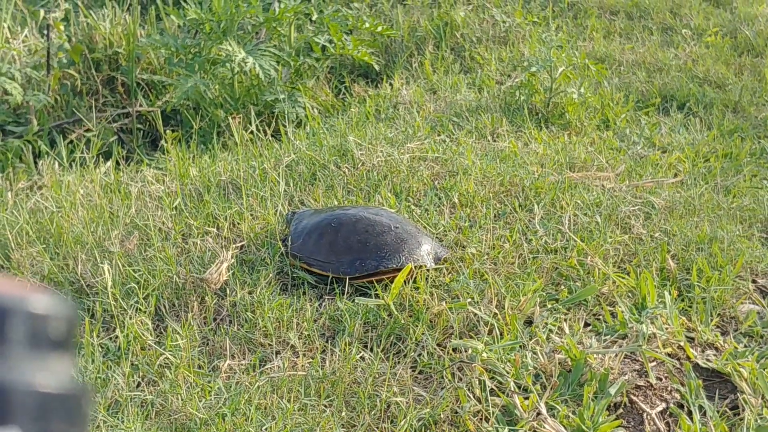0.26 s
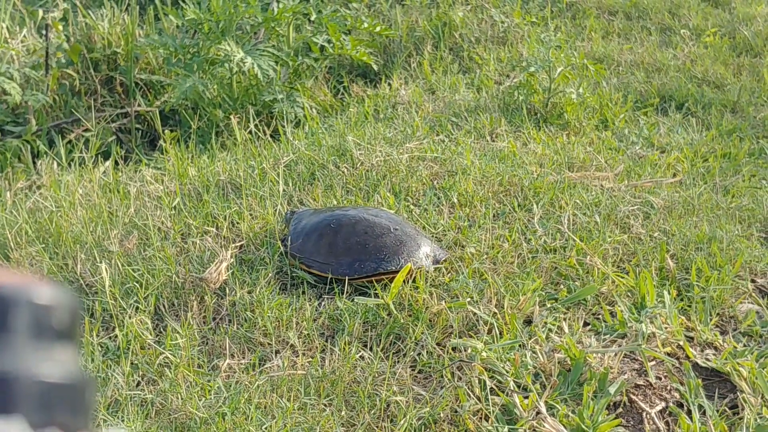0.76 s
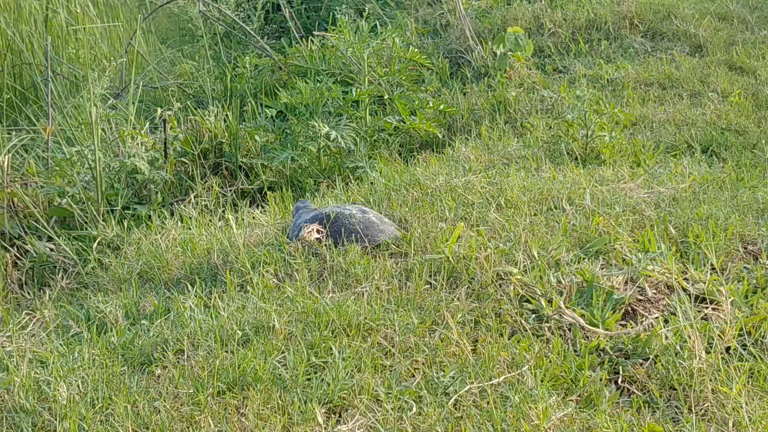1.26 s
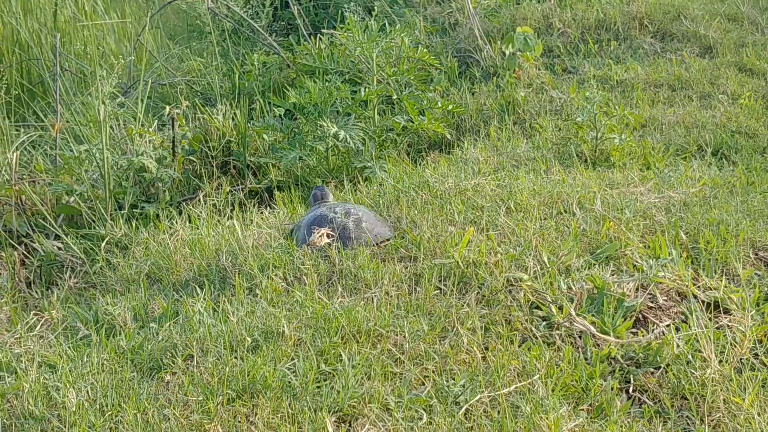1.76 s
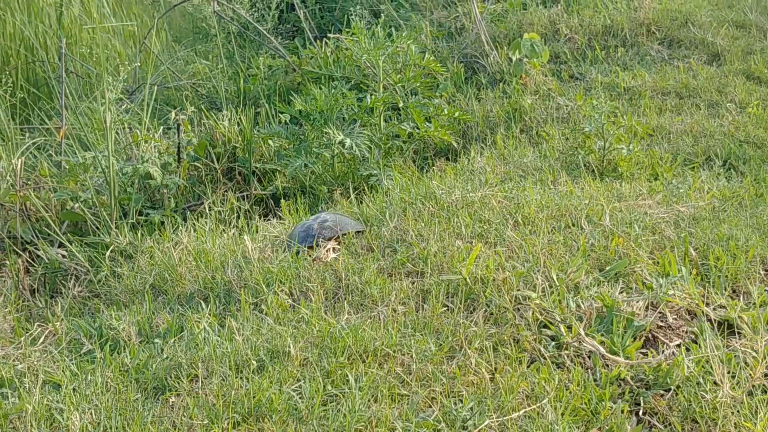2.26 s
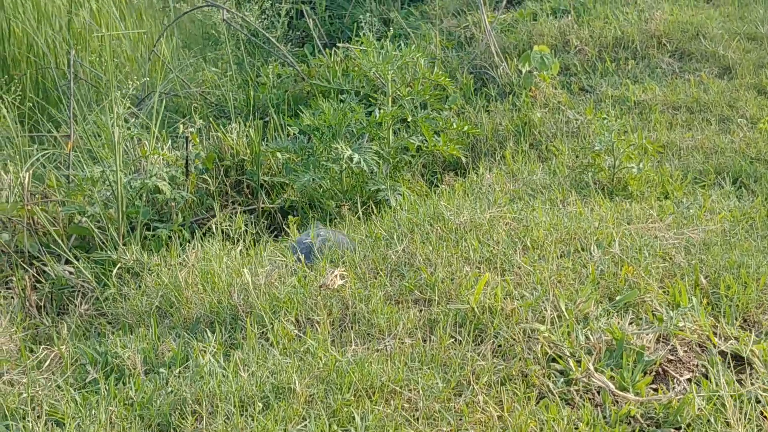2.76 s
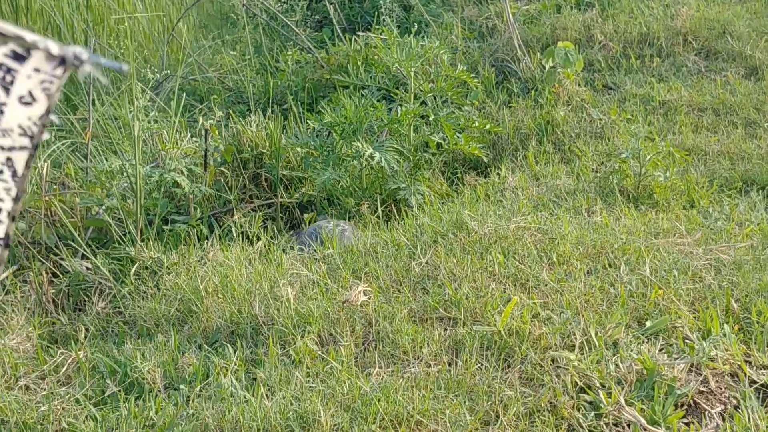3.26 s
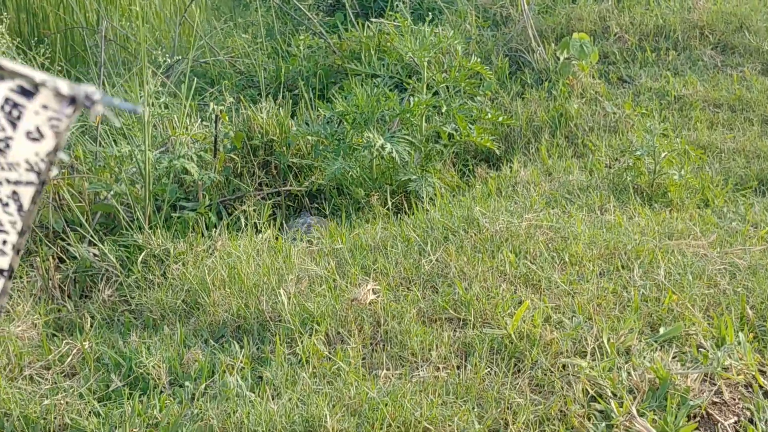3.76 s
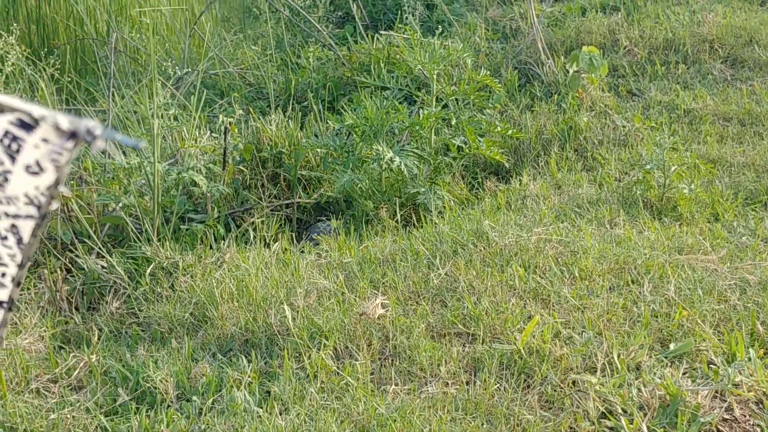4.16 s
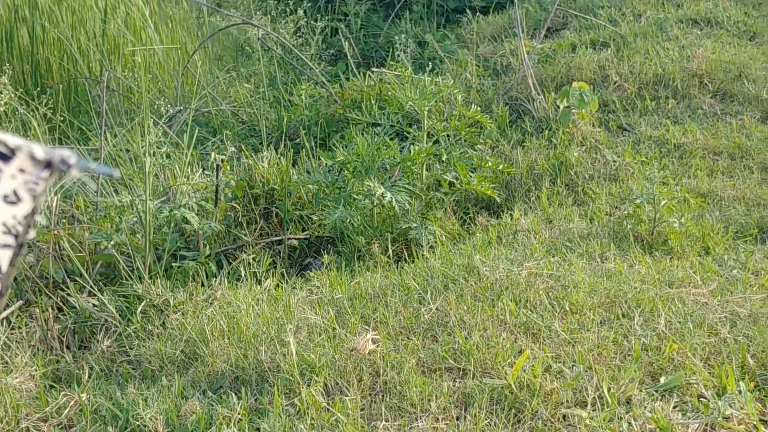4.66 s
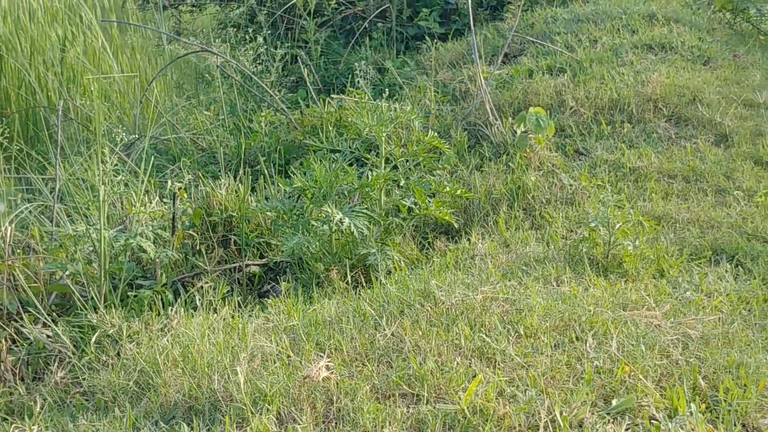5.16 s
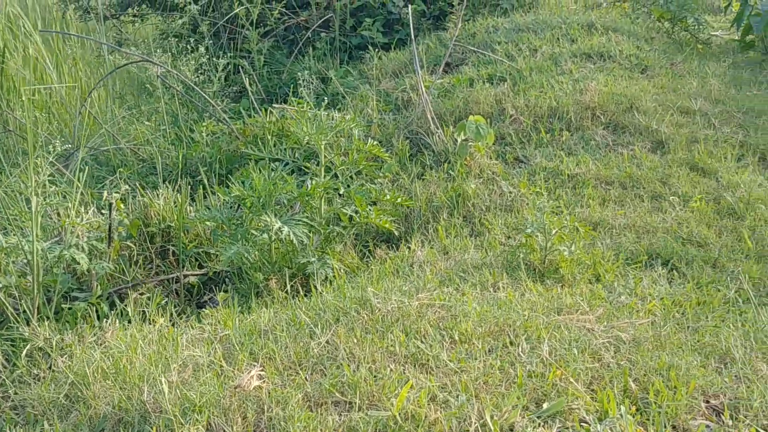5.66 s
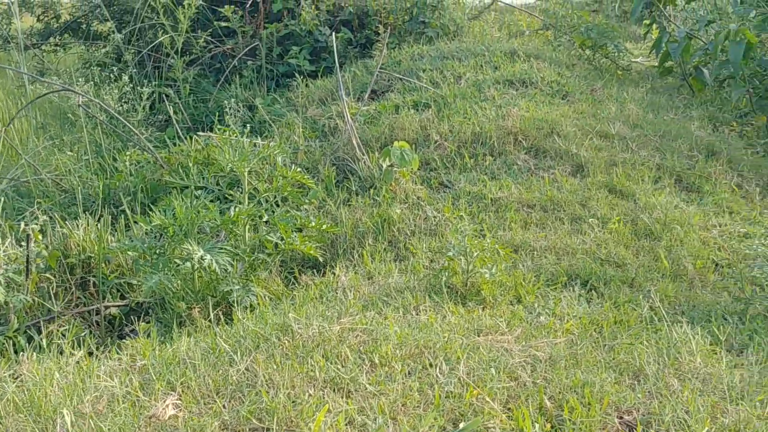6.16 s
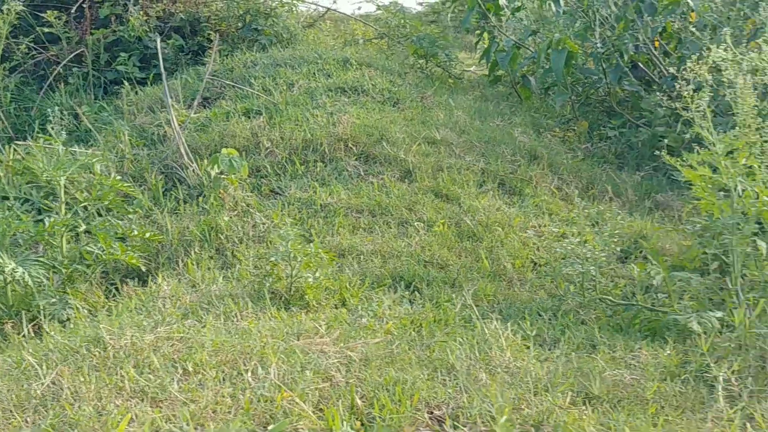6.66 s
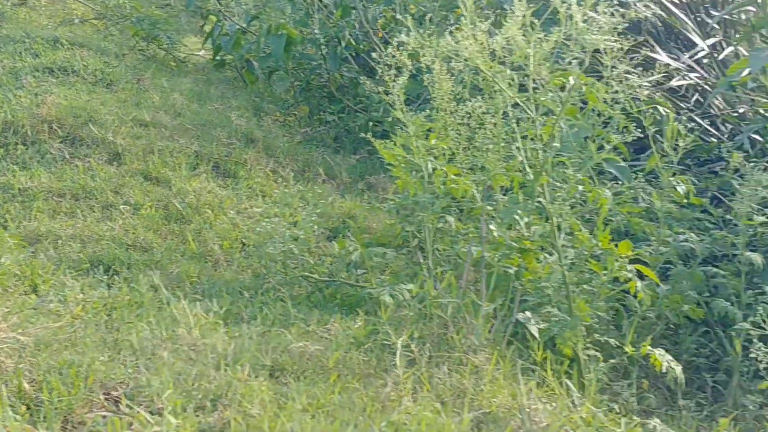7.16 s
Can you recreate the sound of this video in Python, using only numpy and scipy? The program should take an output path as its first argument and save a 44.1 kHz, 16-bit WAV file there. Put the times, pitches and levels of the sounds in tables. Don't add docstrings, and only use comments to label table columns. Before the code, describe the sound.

Outdoors, crickets ring thinly on the left while sparse bird chips grow into rapid chirrups and falling whistles, with gusts and rustles at the microphone.

```python
import sys
import numpy as np
from scipy import signal
from scipy.fft import rfft, irfft
from scipy.io import wavfile
from scipy.ndimage import uniform_filter1d

SR = 44100
rng = np.random.default_rng(int(sys.argv[2]) if len(sys.argv) > 2 else 0)


def linear_from_db(decibels):
    return 10 ** (np.asarray(decibels, float) / 20)


def bounce(signal):
    frames = np.transpose(np.atleast_2d(signal))
    limited = np.clip(frames, -1, 1)
    pcm = np.round(limited * 32767).astype(np.int16)
    wavfile.write(sys.argv[1], SR, pcm)


N = 326340
CHANGE_S = 1.47


def curve(rows):
    s, value = np.transpose(rows)
    return np.interp(np.arange(N) / SR, s, value)


def coloured(spectrum):
    hz, db = np.transpose(spectrum)
    bins = np.maximum(np.fft.rfftfreq(N, 1 / SR), 1)
    gain = linear_from_db(np.interp(np.log(bins), np.log(hz), db, left=-90, right=-90))
    x = irfft(rfft(rng.standard_normal((2, N))) * gain, N)
    return x / np.sqrt(np.mean(x ** 2))


def drift(rate_hz):
    r = np.exp(-2 * np.pi * rate_hz / SR)
    x = signal.lfilter([1], [1, -2 * r, r * r], rng.standard_normal(N + SR))[SR:]
    return x / x.std()


def swells(s, db, rise_db_per_s, fall_db_per_s, hold_s=0):
    grid = np.arange(0, N + 32, 32)
    t = grid[:, None] / SR - s
    gain = linear_from_db(db + rise_db_per_s * np.minimum(t, 0) - fall_db_per_s * np.maximum(t - hold_s, 0))
    return np.interp(np.arange(N), grid, gain.sum(axis=1))


def add(out, s, sound, pan_db):
    at = round(s * SR)
    sound = sound[max(-at, 0):N - at]
    at = max(at, 0)
    out[:, at:at + len(sound)] += sound * linear_from_db(np.array([[pan_db / 2], [-pan_db / 2]]))


def sing(hz, db, fade_s):
    ends = np.minimum(np.arange(len(hz)), np.arange(len(hz))[::-1]) / SR / fade_s
    phase = 2 * np.pi * np.cumsum(hz) / SR
    return np.sqrt(2) * linear_from_db(db) * np.sin(np.pi / 2 * np.minimum(ends, 1)) ** 2 * np.sin(phase)


def outdoors(x, ground_db, leaves_db, t60):
    t = np.arange(round(.3 * SR)) / SR
    paths = rng.standard_normal((2, len(t))) * linear_from_db(-60 * t / t60) * np.minimum(t / 0.0026, 1)
    paths = signal.lfilter([1], [1, -.3], paths)
    paths *= linear_from_db(leaves_db + 3.0) / np.sqrt(np.sum(paths ** 2, axis=1, keepdims=True))
    left_lag = 10
    paths[[0, 1], [left_lag, 0]] += 1
    paths[[0, 1, 0, 1], [230, 270, 520, 560]] += linear_from_db(ground_db)
    return signal.fftconvolve(x, paths, axes=1)[:, :N]


def phrases(calls, levels, turns, pickup, dwell_s, fall_s, rise_s, tail_s,
            sweep_db, fade_db_per_s, uneven_db):
    out, waver, flutter = np.zeros((2, N)), drift(40), drift(51)
    lead_s, from_hz, to_hz, lead_db = pickup
    half = dwell_s / 2
    shelf_ends = [row[0] - half - rise_s for row in turns[1:]] + [turns[-1][0] + tail_s]
    corners = [(-lead_s, from_hz, lead_db), (-half - rise_s, to_hz, lead_db)]
    for (top, top_hz, trough_hz, shelf_hz, top_db), shelf_end in zip(turns, shelf_ends):
        fallen = top + half + fall_s
        corners += [(top - half, top_hz, top_db), (top + half, top_hz, top_db)]
        corners += [(fallen, trough_hz, 0), (max(shelf_end, fallen + 1e-4), shelf_hz, 0)]
    at, shape_hz, shape_db = np.transpose(corners)
    at = np.maximum.accumulate(at)
    for (s, slowness, share), (db, pan_db) in zip(calls, levels):
        t = np.arange(at[0] * slowness, at[-1] * slowness, 1 / SR)
        here = ((t + s) * SR).astype(int)
        rounded_hz = uniform_filter1d(np.interp(t / slowness, at, shape_hz), size=130, mode="nearest")
        hz = share * rounded_hz * (1 + .012 * waver[here])
        rise_khz_per_ms = np.maximum(np.gradient(hz), 0) * SR / 1e6
        level_db = db + np.interp(t / slowness, at, shape_db) - sweep_db * rise_khz_per_ms
        level_db += uneven_db * flutter[here] - fade_db_per_s * np.maximum(t, 0)
        add(out, s + t[0], sing(hz, level_db, fade_s=0.0038), pan_db)
    return out


def brief_phrases(calls, levels, turns, tail_s):
    return phrases(calls, levels, turns, (.014, 3000, 3900, -7), dwell_s=.005, fall_s=.006, rise_s=.005,
                   tail_s=tail_s, sweep_db=6, fade_db_per_s=40, uneven_db=3.5)


# top in seconds, top in Hz, trough in Hz, shelf in Hz, top level in dB.
FAR_TURNS = [(0, 5450, 4100, 3800, 2), (.025, 5500, 3300, 2450, 1)]
# first top in seconds, slowness (1 = usual), pitch share.
FAR_CALLS = [
    (-0.003, 1, .94),
    (2.168, 1, 1),
]
# level in dB, left-right in dB.
FAR_LEVELS = [(-67, -6.5), (-59.5, 3)]


def far_chirrups():
    return outdoors(brief_phrases(FAR_CALLS, FAR_LEVELS, FAR_TURNS, .021),
                    ground_db=-8, leaves_db=1.5, t60=.14)


# frequency in Hz, level in dB per Hz.
AIR = [(24, -38), (40, -14), (113, -0.5), (190, -11), (347, -18.5), (693, -18.5), (938, -23.5),
       (1120, -20.5), (1720, -26), (2950, -21), (3430, -25.5), (6560, -27.5), (7000, -36.5), (9000, -63.5)]


def far_air():
    return linear_from_db(-63 + 0.47 * drift(0.88)) * coloured(AIR)


# pitch in Hz, a chirp's centre in seconds, chirp rate
# in Hz, level in dB.
CRICKETS = [
    [(8310, .125, 5.86, -53), (7680, .095, 6.05, -56), (7985, .22, 5.9, -54)],
    [(8115, 1.567, 6.46, -53), (7680, 1.52, 6.14, -55), (7975, 3.3, 6.3, -54)],
]
# frequency in Hz, level in dB per Hz.
CHORUS = [(6500, -40.5), (7000, -28), (7410, -14), (7690, 1), (7990, 8.5), (8170, 5), (8420, -8.5),
          (8950, -22.5)]


def crickets():
    t, near = np.arange(N) / SR, 0
    for changed, rows in enumerate(CRICKETS):
        for hz, centre, rate, db in rows:
            since = ((t - centre) * rate + .5 + 0.052 * drift(0.43)) % 1 / rate - .5 / rate
            stroke = np.abs(since) - .022
            pulse = np.exp(-.5 * (stroke / .0085) ** 2) * ((t > CHANGE_S) == changed)
            phase = 2 * np.pi * np.cumsum(hz + 8 * drift(40)) / SR
            near = near + 2.9 * linear_from_db(db + 1.87 * drift(3.7)) * pulse * np.sin(phase)
    near = signal.sosfilt(signal.butter(3, [7400, 8600], "band", fs=SR, output="sos"), near)
    far = linear_from_db(-45 + .8 * drift(2.4) + 2.2 * drift(18)) * coloured(CHORUS)
    both = outdoors(np.array([near, near]), ground_db=-10, leaves_db=-5, t60=.1) + far
    return both * linear_from_db(np.array([[0], [-16]]))


def low_cut(x):
    return signal.sosfilt(signal.butter(2, 45, "high", fs=SR, output="sos"), x)


# time in seconds, level in dB.
BREEZE = [(0, -56), (.15, -78), (.85, -73), (1.0, -62.5), (1.38, -66), (1.5, -57), (2.0, -61.5),
          (2.84, -69), (3.4, -68), (3.8, -56), (4.06, -58.5), (4.85, -67), (5.46, -66), (7.4, -65.5)]
# top in seconds, peak in dB, brightness in dB.
GUSTS = [(1.58, -52, -28), (1.686, -39.5, -18), (1.827, -41, -26), (1.917, -45.5, -13), (2.298, -58, -17),
         (2.349, -47.5, -9.5), (2.427, -44, -9), (2.639, -40, -22), (2.69, -51, -22), (3.489, -53, -10),
         (3.543, -62.5, 2.5), (4.118, -45, -33), (4.2, -47, -16.5), (4.286, -42, -20), (4.391, -39.5, -22),
         (4.586, -40, -8.5), (4.67, -44.5, -13.5), (4.739, -44.5, -8.5), (5.069, -41, -17),
         (5.27, -40.5, -15), (5.852, -42.5, -4), (6.139, -50, -17), (6.347, -47.5, -26), (6.65, -42.5, 1),
         (7.13, -57.5, -17), (7.288, -40, -3), (7.351, -51, -25)]
# frequency in Hz, level in dB per Hz.
PORT = [(15, -39), (25, -42.5), (47, -2.5), (81, 4), (173, -1.5), (259, -15), (300, -23.5), (390, -50),
        (660, -120)]


def wind():
    breeze = linear_from_db(curve(BREEZE))
    s, db, bright_db = np.transpose(GUSTS)
    gusts = swells(s, db, rise_db_per_s=428, fall_db_per_s=339)
    edges = swells(s, db + bright_db + 6.5, rise_db_per_s=1199.5, fall_db_per_s=604.5)
    sharp = linear_from_db(-12.5) * breeze + edges
    lumps_db = np.array([8.75 + 2.0 * drift(9.7), -9 + 2.4 * drift(4.4)])
    high = coloured([(180, 6.5), (230, 2), (330, -7.5), (480, -20.0), (750, -34.0)])
    return low_cut(linear_from_db(lumps_db) * ((breeze + gusts) * coloured(PORT) + sharp * high))


# frequency in Hz, width in Hz, level in dB.
HUM = [
    (93.3, 8.5, -60),
    (141, 8.7, -58),
    (184.4, 16, -63.5),
]


def far_engine():
    hum = sum(linear_from_db(db) * coloured([(hz - width, -15), (hz, 0), (hz + width, -15)])
              for hz, width, db in HUM)
    return low_cut(hum * np.interp(np.arange(N) / SR, [CHANGE_S - .07, CHANGE_S + .03], [.2, 1]))


# time in seconds, level in dB.
HANDLING = [(0, -106), (.89, -75.5), (1.23, -62.5), (1.46, -74.5), (1.8, -67), (2.14, -92), (2.27, -72),
            (4.55, -72), (4.7, -85), (5.2, -72.5), (5.48, -74.5), (5.97, -66), (6.08, -80), (6.68, -66.5),
            (7.4, -70.5)]
# top in seconds, peak in dB.
SHIFTS = [(1.418, -53.5), (3.15, -68), (3.81, -79), (4.37, -67), (4.592, -64), (5.25, -69), (6.001, -58),
          (6.17, -63), (6.88, -72)]
# frequency in Hz, level in dB per Hz.
RUSTLE = [(180, -32), (300, -3.5), (776, -4), (996, -11), (1190, -6.5), (1560, -13), (2200, -10.5),
          (2860, -42.5), (4840, -120)]
# time in seconds, level in dB.
CRINKLE = [(0.95, -83), (1.036, -78), (1.056, -80), (1.096, -64), (1.124, -73), (1.45, -61.5),
           (1.486, -69.5), (1.6, -92)]
# time in seconds, peak in dB, ring in Hz, left-right in dB.
TICKS = [(0.249, -57, 5240, -10), (0.503, -53.5, 5230, 1), (0.691, -65, 6360, -19),
         (0.746, -59.5, 5030, -5), (0.762, -48.5, 5360, -7), (1.03, -60, 5000, -17),
         (1.094, -49.5, 3080, -17), (1.24, -57.5, 10000, 15), (1.302, -61, 2570, -22),
         (1.443, -48, 3480, -10), (1.53, -60, 4500, -8), (2.493, -47.5, 2450, 3), (2.837, -59, 6750, 21),
         (2.85, -57, 6800, 16.5), (2.858, -62, 5200, 11), (3.356, -54, 4530, -4), (3.726, -54, 2300, 11),
         (4.374, -42.5, 1160, 7), (5.4, -65, 10350, 12), (5.63, -64, 5500, 5), (5.687, -58, 5500, 1),
         (5.991, -39.5, 1240, 3)]


def handling():
    rub = linear_from_db(curve(HANDLING)) + swells(*np.transpose(SHIFTS), rise_db_per_s=350, fall_db_per_s=346)
    grains = coloured(RUSTLE) * linear_from_db(2.52 * drift(130))
    out = rub * (grains + 0.24 * grains[::-1])
    bright = coloured([(1800, -31.0), (2500, -2.0), (4500, -4.5), (6500, -14.0), (7500, -30.5)])
    bright = bright * linear_from_db(2.4 * drift(200))
    out += linear_from_db(curve([(.9, -99)] + list(CRINKLE) + [(1.65, -99)]) + 3.5) * bright
    t = np.arange(round(.04 * SR)) / SR
    for s, db, hz, pan_db in TICKS:
        band = signal.butter(2, [hz / 1.4, hz * 1.15], "band", fs=SR, output="sos")
        decay = linear_from_db(-60 * t / 0.017) + 0.15 * linear_from_db(-60 * t / 0.96)
        tick = signal.sosfilt(band, decay * rng.standard_normal(len(t)))
        add(out, s, 2.0 * linear_from_db(db) * tick, pan_db)
    return out


# top in seconds, top in Hz, trough in Hz, shelf in Hz, top level in dB.
WARBLE_TURNS = [(0, 3200, 2550, 2500, -1), (.035, 3250, 2550, 2750, -1), (.071, 3100, 2550, 2500, -3)]
# first top in seconds, slowness (1 = usual), pitch share.
WARBLES = [
    (0.099, 1.1, .97),
    (.43, 1.1, .97),
    (1.781, 1, 1),
    (3.434, .98, .93),
    (3.845, 1.02, .93),
    (4.167, 1.03, .93),
    (6.172, 1.01, 1.06),
]
# level in dB, left-right in dB.
WARBLE_LEVELS = [(-61.5, 4.5), (-62.5, 2), (-49, -6), (-48, -4.5), (-48.5, -8.5), (-49, -8.5), (-47, -10.5)]


def low_warbles():
    song = phrases(WARBLES, WARBLE_LEVELS, WARBLE_TURNS, (.031, 2400, 2850, -5), dwell_s=.004, fall_s=.017,
                   rise_s=.006, tail_s=.02, sweep_db=110, fade_db_per_s=30, uneven_db=3)
    return outdoors(song, ground_db=-18, leaves_db=-12, t60=.1)


TWITTER_S = [.29, .552]
# delay in seconds, length in seconds, from Hz, to Hz, level in dB.
TWITTER = [
    (0, 0.0073, 4900, 4050, -70),
    (0.019, 0.0077, 5230, 4230, -79),
    (0.02, .01, 4300, 3650, -64.5),
]
# start in seconds, length in seconds, from Hz, to Hz, level in dB.
CHIPS = [(0.78, .018, 5650, 3700, -59), (0.797, 0.018, 4100, 4200, -69), (0.831, .012, 3400, 4400, -66),
         (2.044, 0.021, 5520, 3700, -63), (2.863, 0.015, 5650, 3640, -56), (2.933, 0.014, 4450, 4500, -62),
         (2.953, 0.0093, 4880, 4740, -60), (2.989, 0.0093, 4150, 4000, -62), (3.003, .01, 4400, 4100, -57),
         (3.016, .011, 3890, 3450, -50), (3.214, 0.035, 4450, 5080, -69), (3.27, .026, 4000, 3940, -70),
         (3.631, 0.014, 5220, 4740, -56.5), (6.692, 0.012, 4450, 5160, -53),
         (5.321, 0.0092, 5400, 4400, -59), (7.34, 0.017, 3800, 5470, -67), (7.36, 0.022, 5230, 4000, -64),
         (7.381, 0.017, 4650, 4820, -63)]
# start in seconds, length in seconds, from Hz, to Hz, level in dB.
PIPS = [(1.638, 0.0086, 2320, 2980, -54.5), (2.839, 0.015, 2490, 3330, -62.5),
        (3.084, 0.021, 2565, 2920, -51), (3.121, .017, 3090, 2610, -63), (3.162, 0.013, 2360, 2840, -58.5),
        (4.317, 0.049, 2660, 3120, -61), (4.85, 0.038, 3093, 2950, -65), (4.92, 0.025, 2935, 2965, -69),
        (5.58, 0.015, 3000, 2570, -54.5), (5.909, 0.013, 2910, 2580, -52.5),
        (6.206, 0.024, 3760, 2890, -49), (6.465, 0.035, 2530, 2980, -56), (6.502, 0.034, 3115, 2544, -49),
        (6.548, 0.0225, 3360, 2590, -47.5), (6.899, 0.025, 2450, 2910, -60),
        (7.139, 0.043, 2480, 2850, -57.5), (7.172, 0.019, 2760, 3810, -46), (7.185, 0.016, 3750, 2620, -60)]
# start in seconds, length in seconds, from Hz, level in dB.
FLICKS = [
    (3.042, 0.021, 5260, -62.5),
    (5.942, 0.017, 4450, -60),
    (6.244, 0.014, 4970, -57),
    (6.7, 0.025, 5540, -55.5),
    (7.204, 0.048, 4020, -61),
]


def short_notes():
    notes = [(s + later, *note, -1) for s in TWITTER_S for later, *note in TWITTER]
    notes += [(*note, 6) for note in CHIPS]
    notes += [(*note, -6.5) for note in PIPS]
    notes += [(s, length, hz, 7000, db, 5.5) for s, length, hz, db in FLICKS]
    out, flutter = np.zeros((2, N)), 2.2 * drift(90)
    for s, length, from_hz, to_hz, db, pan_db in notes:
        size = round(length * SR)
        level_db = db + flutter[round(s * SR):][:size]
        add(out, s, sing(np.linspace(from_hz, to_hz, size), level_db, fade_s=.005), pan_db)
    return out


# start in seconds, end in seconds, level in dB.
DRONE = [
    (2.403, 4.3, -78.5),
    (4.415, 4.47, -61.5),
    (5.857, 7.5, -64.5),
]


def insect_drone():
    s, end, db = np.transpose(DRONE)
    bouts = swells(s, db, rise_db_per_s=107, fall_db_per_s=107, hold_s=end - s)
    buzz = coloured([(2200, -13.5), (2400, -9), (2500, -3.0), (2620, -15.5), (2900, -6.0)])
    return bouts * linear_from_db(4.2 * drift(30)) * buzz


# top in seconds, top in Hz, trough in Hz, shelf in Hz, top level in dB.
BRIEF_TURNS = [(0, 5500, 4050, 3750, -3), (.026, 5500, 3500, 3600, -2), (.041, 4150, 3400, 2600, -2)]
# first top in seconds, slowness (1 = usual), pitch share.
BRIEF_CALLS = [(2.723, 1, .99), (3.032, .97, 1), (3.517, .92, 1.01), (3.839, 1, 1.01), (4.176, 1, 1.01),
               (5.06, .93, .99), (5.72, .9, .97), (6.389, .9, .96)]
# level in dB, left-right in dB.
BRIEF_LEVELS = [(-53.5, 1.5), (-49, 2.5), (-50.5, 3.5), (-50, 6.8), (-43, 3.4), (-49, 1.5), (-47.5, 3.1),
                (-49, 5.5)]


def brief_chirrups():
    return outdoors(brief_phrases(BRIEF_CALLS, BRIEF_LEVELS, BRIEF_TURNS, .015),
                    ground_db=-9, leaves_db=-4, t60=0.13)


# time in seconds, pitch in Hz, level in dB.
WHISTLES = [
    [(6.545, 4220, -49), (6.56, 5450, -51), (6.62, 4300, -46.5), (6.64, 3530, -47.5), (6.66, 4100, -50.5),
     (6.695, 3400, -47), (6.706, 4370, -55.5), (6.735, 2520, -42.5)],
    [(6.76, 5120, -45), (6.81, 4485, -43), (6.87, 4180, -39.5), (6.93, 3887, -43), (6.97, 3480, -43.5),
     (7.012, 2810, -50)],
    [(7.262, 3367, -56.5), (7.3, 3360, -48.5), (7.33, 3372, -53), (7.4, 3417, -56)],
    [(6.44, 4900, -39.5), (6.465, 3930, -48), (6.49, 3070, -43)],
    [(3.3, 4480, -64), (3.32, 3600, -68), (3.345, 4850, -64.5), (3.365, 7040, -64)],
    [(3.6, 4215, -68), (3.635, 3520, -67), (3.65, 4500, -61), (3.67, 6060, -65)],
]


def whistles():
    out, flutter = np.zeros((2, N)), 2.2 * drift(90)
    for rows in WHISTLES:
        s, hz, db = np.transpose(rows)
        t = np.arange(s[0], s[-1], 1 / SR)
        level_db = np.interp(t, s, db) + flutter[np.minimum(t * SR, N - 1).astype(int)]
        add(out, s[0], sing(np.interp(t, s, hz), level_db, fade_s=.006), pan_db=5)
    return out


# top in seconds, top in Hz, trough in Hz, shelf in Hz, top level in dB.
FULL_TURNS = [(0, 6250, 3950, 4250, -9), (.025, 5900, 3850, 4100, -6), (.048, 5550, 3550, 3800, -7),
              (.066, 5550, 3850, 3650, -7), (.089, 5200, 3600, 3150, -8)]
# first top in seconds, slowness (1 = usual), pitch share.
FULL_CALLS = [(3.927, .95, .99), (4.357, .98, .95), (5.146, .99, .99), (5.519, 1, 1.02), (5.849, .98, .97),
              (6.171, .99, 1.02), (6.442, .95, 1.01), (6.741, .98, .95)]
# level in dB, left-right in dB.
FULL_LEVELS = [(-52.5, 10.5), (-46.5, 10), (-47.5, 11), (-40.5, 8.2), (-45.5, 8.3), (-44.5, 9.7),
               (-44, 7.9), (-44, 6.4)]


def full_chirrups():
    return phrases(FULL_CALLS, FULL_LEVELS, FULL_TURNS, (.012, 3900, 4700, -13), dwell_s=.001, fall_s=.0085,
                   rise_s=.0055, tail_s=.022, sweep_db=3, fade_db_per_s=30, uneven_db=4)


# first top in seconds, length in seconds, turn rate in Hz, level in dB,
# left-right in dB.
CHIRRUPS = [
    (6.893, 0.24, 46.8, -40, 3.5),
]


def chirrup_trill():
    out, reach, flutter = np.zeros((2, N)), drift(25.1), drift(53)
    lead_s, trough_hz, swing_hz, sag_hz, beak_hz = 0.013, 4138, 1881.6, 818.0, 4300
    for s, length, turns, db, pan_db in CHIRRUPS:
        t = np.arange(-lead_s, length, 1 / SR)
        later, here = np.maximum(t, 0), ((t + s) * SR).astype(int)
        turn = np.maximum(turns * (t - .003 * (1 - np.exp(-later / .012))), -.5)
        height = (.5 + .5 * np.cos(2 * np.pi * turn)) ** 1.6
        swing = swing_hz * np.exp(-later / .4) * (1 + 0.1126 * reach[here])
        hz = trough_hz - sag_hz * (1 - np.exp(-(later / 0.09) ** 1.3)) + swing * height
        hz -= 45 * sag_hz * np.maximum(-t - .004, 0)
        off = np.log2(hz / beak_hz)
        level_db = db - np.where(off > 0, 45, 18) * off ** 2 - 30 * later + 2.0 * flutter[here]
        level_db += 1.5 * np.maximum(-np.sin(2 * np.pi * turn), 0) + 500 * np.minimum(t - .01, 0)
        add(out, s - lead_s, sing(hz, level_db, fade_s=0.0051), pan_db)
    return out


def scene():
    nearest = outdoors(full_chirrups() + chirrup_trill(), ground_db=-12, leaves_db=-7, t60=.18)
    glides = outdoors(short_notes() + whistles(), ground_db=-19.5, leaves_db=-4.0, t60=0.22)
    birds = far_chirrups() + low_warbles() + glides + brief_chirrups() + nearest
    insects = crickets() + insect_drone()
    return birds + insects + wind() + far_engine() + handling() + far_air()


def roll_off(x):
    return signal.sosfilt(signal.butter(12, 17000, fs=SR, output="sos"), x)


# frequency in Hz, level in dB per Hz.
HISS = [(6350, -56), (10800, -8.5), (11200, 0), (13700, 2), (15100, 10.5), (15800, -10.5)]


def record(dry):
    hiss = linear_from_db(-81 + 0.61 * drift(3.5)) * coloured(HISS)
    return roll_off(dry + hiss)


dry = scene()
out = record(dry)
bounce(out)
```